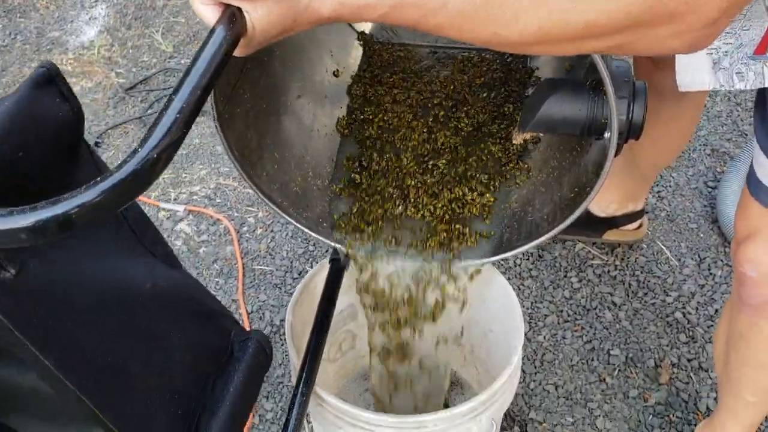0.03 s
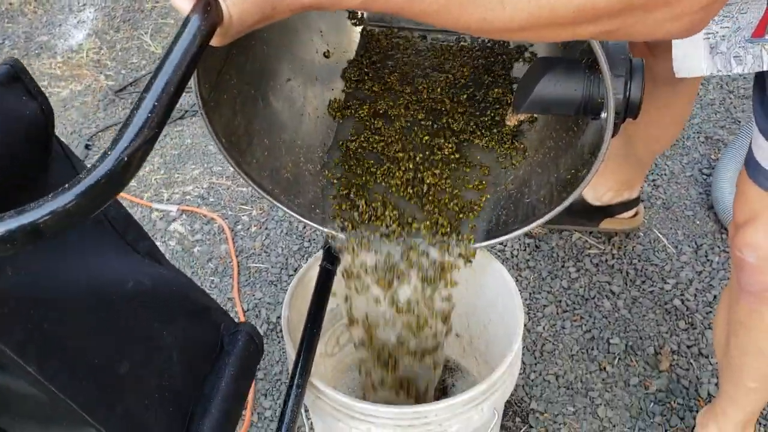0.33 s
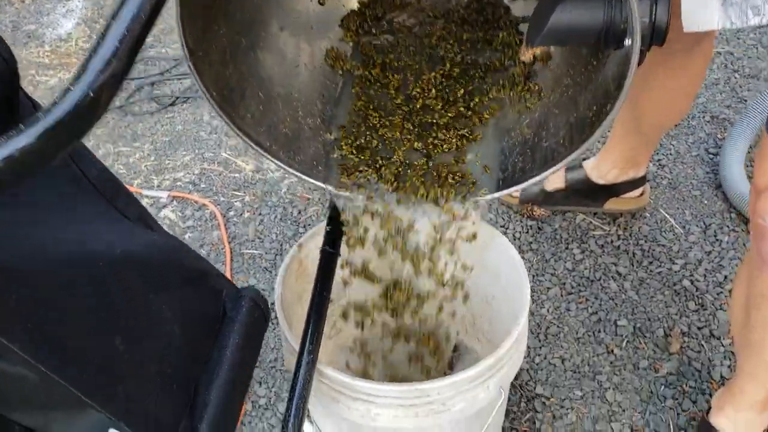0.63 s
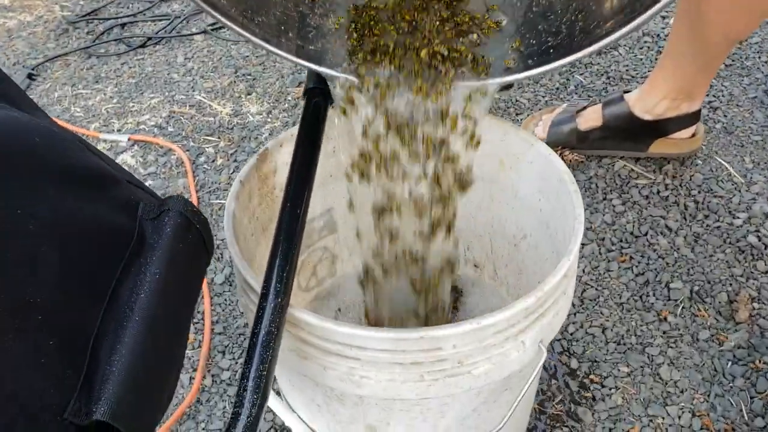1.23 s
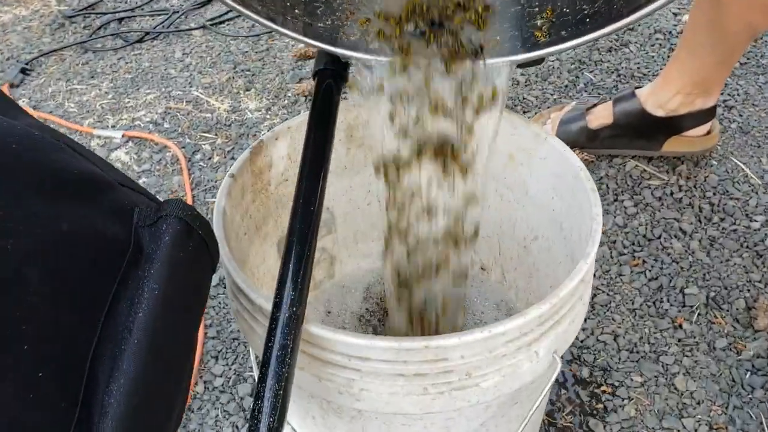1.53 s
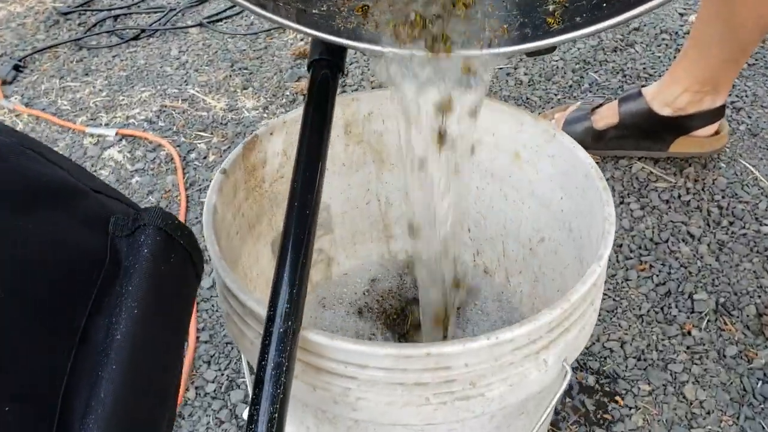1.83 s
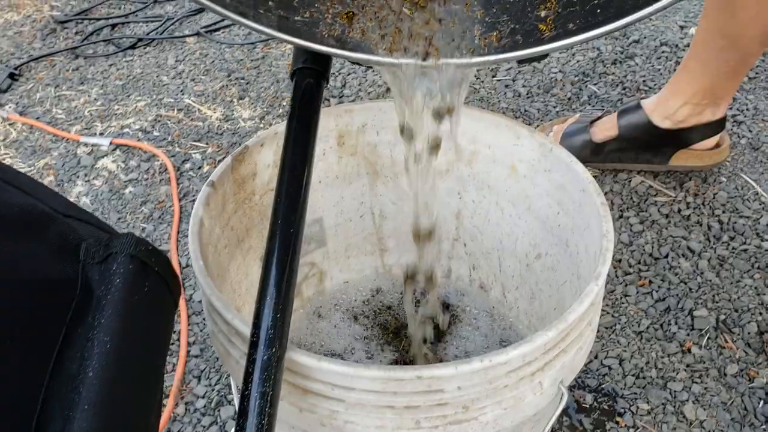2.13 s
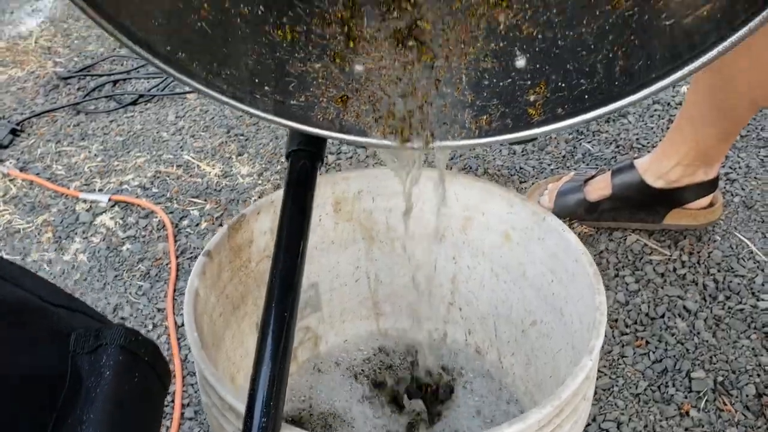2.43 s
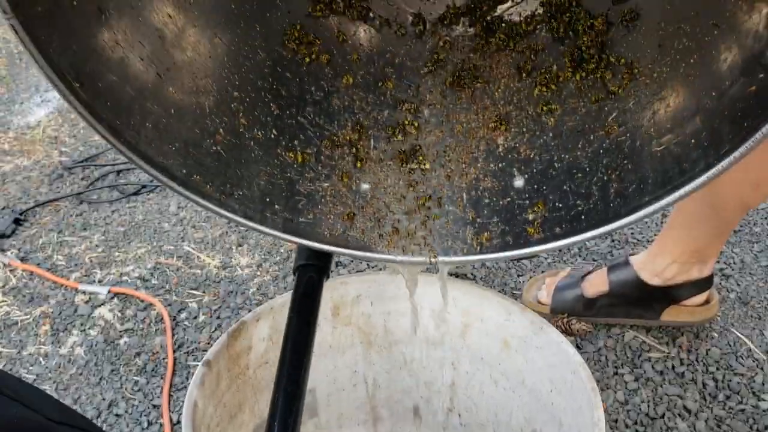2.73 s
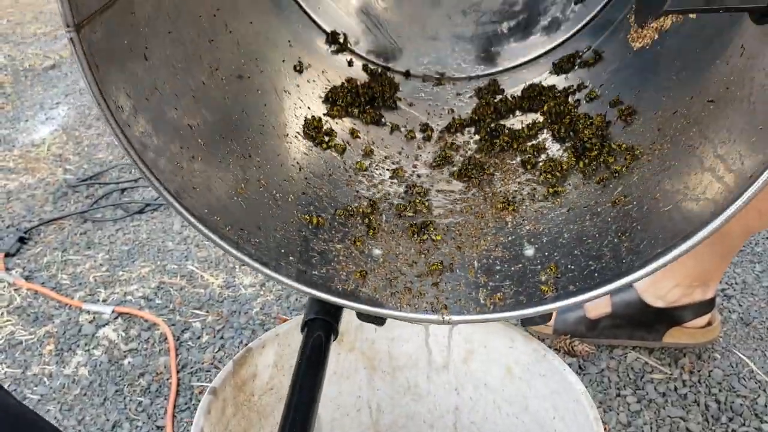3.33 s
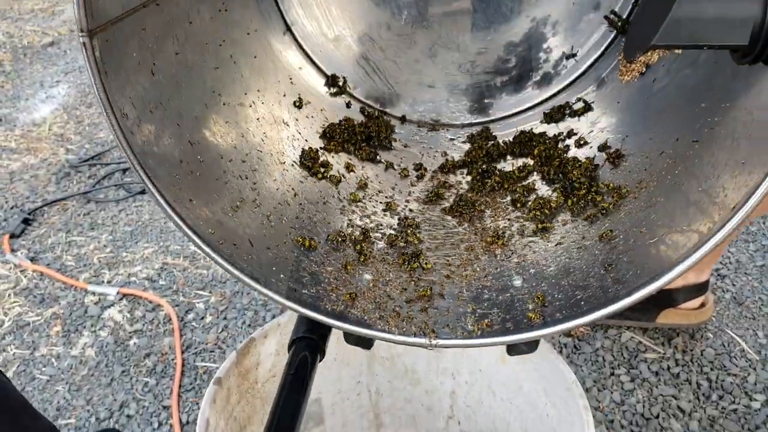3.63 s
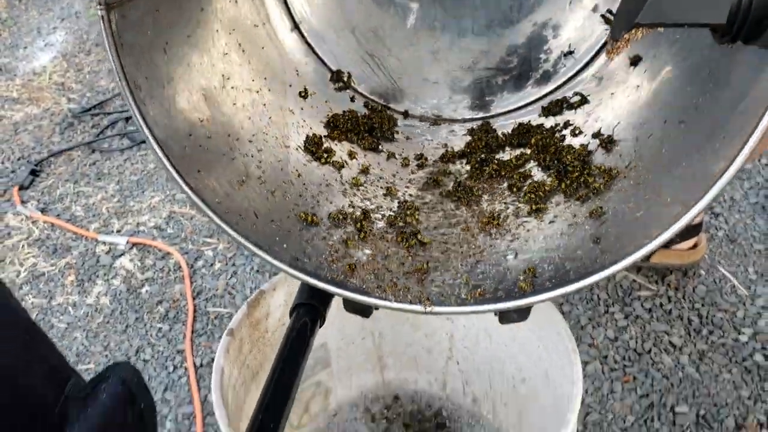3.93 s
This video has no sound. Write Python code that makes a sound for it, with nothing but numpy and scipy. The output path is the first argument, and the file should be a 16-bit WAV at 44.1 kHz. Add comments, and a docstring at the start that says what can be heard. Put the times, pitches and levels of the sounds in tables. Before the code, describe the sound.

A clumpy stream of water gushes into a plastic bucket, tapering off to light drips.

```python
"""Water thick with dead insects pours from a steel drum into a plastic bucket, close to the microphone.
The stream churns the bucket's low resonances, traps bubbles and throws spray; clumps land as splashes.
It thins to a dribble of single drops that tick and slap inside the bucket, a little to the left.
The place is outdoors and quiet: faint open air, and a motor humming far off."""
import sys
import numpy as np
from scipy import signal
from scipy.fft import rfft, irfft, next_fast_len
from scipy.io import wavfile
from scipy.ndimage import map_coordinates

SR = 44100
rng = np.random.default_rng(int(sys.argv[2]) if len(sys.argv) > 2 else 0)


def wav_record(signal):
    """Record a signal, one row per channel, as 16-bit PCM in the file named by sys.argv[1]."""
    frames = np.transpose(np.atleast_2d(signal))
    bounded = np.clip(frames, -1, 1)
    # unit amplitude maps onto the largest positive 16-bit level
    quanta = np.round(bounded * 32767).astype(np.int16)
    wavfile.write(sys.argv[1], SR, quanta)


N = 176400

# The far motor. Each row: frequency in Hz, level in dB.
MOTOR_TONES = [(86.1, -64), (172.3, -71)]
# The pour. Each row: time in seconds, then relative levels in dB of churn, bubbles, spray and fizz.
POUR_LEVELS = [(0, -54, -34, -35, -44), (.16, -43, -37, -35.5, -43.5), (.42, -45, -38, -38, -45.5),
               (.62, -42.5, -32, -36.5, -44.5), (.85, -41.5, -34.5, -38, -42),
               (1.28, -39, -32.5, -36.5, -43), (1.62, -39, -35.5, -38.5, -42),
               (1.88, -41, -34.5, -32.5, -34.5), (2.11, -47, -46.5, -39, -43.5),
               (2.33, -45.5, -39.5, -36, -40.5), (2.52, -57.5, -50.5, -38, -42.5),
               (2.82, -57.5, -48, -40.5, -44.5), (3.1, -54, -52, -47.5, -50.5),
               (3.32, -68.5, -65.5, -52, -54), (3.54, -62.5, -57.5, -50, -52.5),
               (3.72, -73.5, -73.5, -60, -58.5), (4, -68, -98, -63, -70)]
# The stream thinning. Each row: time in seconds, share of a full stream from 0 to 1.
FLOW_SHARE = [(0, 0.9), (1.4, 0.94), (1.9, 0.48), (2.4, .12), (4, .09)]
# Clumps landing. Each row: start in seconds, length in seconds, level in dB.
CLUMP_SPLASHES = [(0.033, 0.033, -32), (0.138, 0.019, -36), (0.734, 0.011, -26), (0.953, 0.03, -29.5),
                  (1.143, 0.07, -31), (1.221, 0.031, -34), (1.269, 0.012, -27), (1.319, 0.0091, -29),
                  (1.326, 0.0062, -26), (1.354, 0.01, -24), (1.389, 0.013, -30), (1.45, 0.015, -25),
                  (1.547, 0.012, -27), (1.593, 0.0095, -24.5), (1.641, 0.013, -29.5), (1.694, .006, -32),
                  (1.706, 0.0085, -24), (2.041, 0.026, -31), (2.146, 0.017, -29), (2.214, 0.043, -28.5),
                  (2.332, 0.037, -37)]
# Heavy clumps reaching the bottom. Each row: start in seconds, level in dB.
CLUMP_THUMPS = [(0.04, -34.5), (0.161, -30), (1.206, -32), (1.356, -32), (1.945, -35)]
# Single drops. Each row: start in seconds, relative level in dB, ring in Hz, relative spatter in dB.
SINGLE_DROPS = [(0.4238, -5.5, 4550, -52), (2.164, 2.5, 4360, -22), (2.271, -5.5, 3340, -42),
                (2.45, -6.5, 3440, -31), (2.463, -12, 6400, -48), (2.4887, -12.5, 6400, -38),
                (2.5187, -5.5, 4000, -33), (2.5622, 0.5, 6540, -32), (2.573, -7.5, 6240, -38),
                (2.597, -14, 5960, -52), (2.709, -3.5, 3390, -38), (2.7503, -14, 7260, -30),
                (2.757, -9, 7160, -29), (2.7989, -11.5, 4860, -32), (2.865, -13, 6700, -25),
                (2.876, -13, 6000, -32), (2.9119, -13.5, 4600, -20), (2.955, -15.5, 3730, -35),
                (3.0448, -10.5, 7400, -31), (3.131, -5, 4200, -30.5), (3.166, -10.5, 6170, -35),
                (3.1805, -14, 6600, -32), (3.19, -14, 6500, -34), (3.2121, -15.5, 6340, -29),
                (3.266, -20.5, 4000, -38), (3.303, -20, 6700, -32), (3.3593, -16, 5430, -49),
                (3.385, -12, 5470, -30.5), (3.481, -18.5, 6600, -47), (3.519, -16, 6850, -33.5),
                (3.5556, -19, 6130, -40), (3.702, -29, 4430, -41), (3.9156, -28, 4660, -60)]
# Air dragged under. Each row: start in seconds, relative level in dB, pitch in Hz.
AIR_POCKETS = [(0.846, -7, 950), (1.278, -14, 760), (1.802, -11.5, 1970), (2.128, -25.5, 359),
               (3.166, -24.5, 980), (3.285, -32.5, 1190), (3.536, -31.5, 845)]
# Blobs slapping the water. Each row: start in seconds, relative level in dB.
BLOB_SLAPS = [(2.448, -17), (2.518, -25.5), (2.573, -25), (2.665, -23), (2.709, -23.5), (2.757, -23.5),
              (2.815, -24), (2.904, -27), (2.953, -24), (3.166, -21.5), (3.286, -28.5), (3.425, -35.5),
              (3.482, -36), (3.5, -31.5), (3.598, -36)]
# Resonances of the bucket's air and body. Each row: centre in Hz, width in Hz, relative gain in dB.
AIR_MODES = [(810, 56, 4.5), (910, 190, -4), (1290, 270, -2.5), (1513, 61, -2.5), (1835, 254, 2.5),
             (2230, 110, 0.5)]
BODY_MODES = [(121, 77, -4.5), (275.8, 32, 4), (366, 226, -4.5)]
# Spectra of the open air and the water sounds. Each row: frequency in Hz, relative level in dB.
OPEN_AIR_SPECTRUM = [(25, -25), (40, 8.5), (65, 1), (330, -9), (500, -18.5), (1000, -14), (2000, -22.5),
                     (16000, -30)]
BUBBLE_SPECTRUM = [(250, -63), (420, -14.5), (570, -6), (660, -1.5), (820, 0), (1150, -1.5), (1500, -6),
                   (1850, -8), (2400, -7.5), (3200, -6)]
SPRAY_SPECTRUM = [(1200, -20), (2300, -11.5), (3100, 0), (4100, 3), (5400, -0.5), (6900, -4), (8000, -12.5),
                  (10000, -46)]
FIZZ_SPECTRUM = [(5500, -14), (8000, -7), (9500, -1), (12000, 2.5), (15800, 3)]
SPLASH_SPECTRUM = [(400, -39), (900, -14), (2300, -4), (3200, 3.5), (4100, 3), (5400, 0.5), (6900, -5),
                   (8100, -12.5), (10500, -9)]
# Stereo width of the bucket's echoes. Each row: frequency in Hz, side over mid in dB.
ECHO_WIDTH = [(100, -23), (300, -2), (700, -11.5), (1500, -3), (3000, 2.5)]
# The bucket's balance at the microphone. Each row: frequency in Hz, left over right in dB.
LEFT_BIAS = [(250, 1), (700, 4), (2000, 2.5), (3300, 2), (5500, -0.5), (7200, 14.5), (8800, -9.5),
             (10500, -1.5), (12500, 2.5), (15500, 6.5)]

BUBBLES_PER_S, DROPLETS_PER_S, PLINKS_PER_S = 1800, 6700, 95  # in a full stream
SURGE_DB, BREAKUP_DB = 2.5, 1.5  # unevenness of a full stream; added as it thins
SIDE_HZ, SIDE_WIDTH_HZ, SIDE_DB = 153, 47, -3.5  # the bucket's side, once loaded with water
SIDE_SHARP, FILL_S = 0.3, 0.42  # it starts higher by this share and sinks as the bucket fills
WALLS_T60_S = 0.066


def amp(db):
    """Decibels to gain."""
    return 10 ** (np.asarray(db) / 20)


def unit(x):
    """x scaled to rms 1."""
    return x / np.sqrt(np.mean(x ** 2) + 1e-20)


def along(points, hz):
    """(Hz, value) points, interpolated on a log frequency axis."""
    knots_hz, values = np.transpose(points)
    return np.interp(np.log(hz + 1), np.log(knots_hz + 1), values)


def curves(rows):
    """One value per sample for each column after the time."""
    times, *columns = np.transpose(rows)
    return [np.interp(np.arange(N) / SR, times, column) for column in columns]


def wobble(rate):
    """A smooth random curve, rate knots a second."""
    return map_coordinates(rng.standard_normal(int(N * rate / SR) + 4), [np.arange(N) * rate / SR])


def filtered(x, response):
    """x through a complex frequency response."""
    size = next_fast_len(N + SR // 2)
    return irfft(rfft(x, size) * response(np.fft.rfftfreq(size, 1 / SR)), size)[..., :N]


def coloured(x, spectrum):
    """x shaped by a (Hz, dB) spectrum, at rms 1."""
    return unit(filtered(x, lambda hz: amp(along(spectrum, hz))))


def resonate(x, modes):
    """x ringing (Hz, width, dB) resonances."""
    return filtered(x, lambda f: sum(amp(db) * 1j * f * width / (hz * hz - f * f + 1j * f * width)
                                     for hz, width, db in modes))


def peaked(x, modes):
    """x through steep (Hz, width, dB) peaks, at rms 1."""
    return unit(filtered(x, lambda f: sum(amp(db) / (1 + (2 * (f - hz) / width) ** 2)
                                          for hz, width, db in modes)))


def add(track, start_s, sound):
    """Mix a sound into the track."""
    i = max(0, round(start_s * SR))
    track[..., i:i + sound.shape[-1]] += sound[..., :max(0, N - i)]


def ping(t, hz, cycles):
    """A bubble's ring: swells for some cycles, then dies."""
    age = t * hz / cycles
    return age * np.exp(1 - age) * np.sin(2 * np.pi * hz * t)


def bubble_cloud(flow, per_s, low_hz, high_hz, cycles, spread_db, samples):
    """Random bubble rings, at rms 1: many in a full stream, few in a thin one."""
    draws = rng.random((int(per_s * N / SR), 4))
    start = (draws[:, 0] * (N - 1)).astype(int)
    kept = draws[:, 1] < flow[start]
    start, pitch, strength = start[kept], draws[kept, 2], draws[kept, 3]
    hz = low_hz + (high_hz - low_hz) * pitch
    gain = amp(spread_db * strength ** 2) * np.sqrt(hz / flow[start])  # short or sparse rings keep power
    rings = gain[:, None] * ping(np.arange(samples) / SR, hz[:, None], cycles)
    positions = start[:, None] + np.arange(samples)
    return unit(np.bincount(positions.ravel(), rings.ravel(), N + samples)[:N])


def outdoors():
    """A motor hums far from the microphone, in faint open-air noise."""
    t = np.arange(N) / SR
    hum = sum(amp(db) * np.sqrt(2) * np.sin(2 * np.pi * hz * t + wobble(6.9)) for hz, db in MOTOR_TONES)
    air = rng.standard_normal(N) + 0.99 * rng.standard_normal((2, N))
    return hum + amp(-62) * coloured(air, OPEN_AIR_SPECTRUM)


def bucket_echoes(x, wet_db, t60_s=WALLS_T60_S):
    """x in stereo with short echoes off the bucket's walls, changing as the water moves."""
    echoes, t = np.zeros((2, N + SR)), np.arange(SR // 10) / SR
    hop = SR // 70
    for i in range(0, N, hop):
        tail = rng.standard_normal((2, len(t))) * amp(-60 * t / t60_s) * (1 - np.exp(-t / 0.00023))
        echo = signal.fftconvolve(x[None, i:i + hop], tail / np.linalg.norm(tail[0]), axes=1)
        echoes[:, i:i + echo.shape[1]] += echo
    mid = x + amp(wet_db) * echoes[0, :N]
    side = amp(wet_db) * filtered(echoes[1, :N], lambda hz: amp(along(ECHO_WIDTH, hz)))
    return np.array([mid + side, mid - side]) / np.sqrt(1 + amp(2 * wet_db))


def thumps():
    """A heavy clump reaches the bottom: one low push, hardly ringing."""
    track, t = np.zeros(N), np.arange(SR // 10) / SR
    for start, db in CLUMP_THUMPS:
        add(track, start, amp(db) * ping(t, hz=155, cycles=0.65))
    return track


def plops():
    """A pocket of air, dragged under, rings for a few cycles."""
    track, t = np.zeros(N), np.arange(SR // 20) / SR
    for start, db, hz in AIR_POCKETS:
        add(track, start, amp(db - 8.5) * ping(t, hz, cycles=1.07))
    return track


def slaps():
    """Blobs slap the water, ringing the bucket's air and body; drops tap them lightly."""
    knocks, t = np.zeros(N), np.arange(SR // 20) / SR
    for start, db in BLOB_SLAPS:
        add(knocks, start, amp(db) * ping(t, hz=1160, cycles=0.36))
    for start, db, _, _ in SINGLE_DROPS:
        add(knocks, start, amp([db - 19]))
    return amp(-3.5) * resonate(knocks, AIR_MODES) + amp(-0.5) * resonate(knocks, BODY_MODES)


def drops():
    """A drop cracks on the surface, rings a tiny bubble and scatters fine spatter."""
    rings, crack, spatter = np.zeros((3, N))
    t = np.arange(SR // 20) / SR
    lead_s = t.mean()  # each burst peaks mid-window, on the impact
    burst = lambda decay_s: np.exp(-abs(t - lead_s) / np.where(t < lead_s, 0.00017, decay_s))
    for start, db, hz, spatter_db in SINGLE_DROPS:
        add(rings, start, amp(db - 10) * ping(t, hz, cycles=1.09))
        add(crack, start - lead_s, amp(db - 24.5) * burst(decay_s=0.00096))
        add(spatter, start - lead_s, amp(spatter_db + 6.5) * burst(decay_s=0.00063))
    crack *= coloured(rng.standard_normal(N), SPRAY_SPECTRUM)
    spatter *= coloured(rng.standard_normal(N), FIZZ_SPECTRUM)
    return rings + crack + spatter


def splashes():
    """Each clump bursts into a short shower of droplets."""
    swell, t = np.zeros(N), np.arange(SR // 5) / SR
    for start, length, db in CLUMP_SPLASHES:
        age = 2 * t / length
        add(swell, start, amp(db) * age * np.exp((1 - age * age) / 2))
    shower = bubble_cloud(np.ones(N), 7000, 486, 16160, cycles=0.74, spread_db=7.5, samples=300)
    return swell * coloured(shower, SPLASH_SPECTRUM)


def churn():
    """The plunging stream booms in the bucket and shakes its side, which rings lower as it fills."""
    churn_db, flow = curves(POUR_LEVELS)[0], curves(FLOW_SHARE)[0]
    pounding = lambda: rng.standard_normal(N) * amp(2.8 * wobble(70))
    pitch_ratio = 1 + SIDE_SHARP * np.exp(-np.arange(N) / SR / FILL_S)
    steady_side = peaked(pounding(), [(SIDE_HZ, SIDE_WIDTH_HZ, 0)])
    sinking_side = np.interp(np.cumsum(pitch_ratio), np.arange(N), steady_side, period=N)
    boom = peaked(pounding(), BODY_MODES)
    return amp(churn_db) * unit(boom + amp(SIDE_DB) * flow * sinking_side)


def stream():
    """Bubbles, spray and fizz surge together; as the stream breaks up, the bucket's air rings clearer."""
    _, bubble_db, spray_db, fizz_db = curves(POUR_LEVELS)
    flow = curves(FLOW_SHARE)[0]
    depth_db = SURGE_DB + BREAKUP_DB * (1 - flow)
    shared_surge = wobble(130)

    def surging(per_s, low_hz, high_hz, hiss, **ring):
        """A bubble cloud over a wash of noise, swelling with the stream."""
        surge = amp(depth_db * (0.87 * shared_surge + 0.88 * wobble(260)))
        cloud = bubble_cloud(flow, per_s, low_hz, high_hz, **ring)
        return surge * (cloud + hiss * np.sqrt(flow) * rng.standard_normal(N))

    gurgle = lambda: surging(BUBBLES_PER_S, 327, 3100, hiss=0.54, cycles=0.63, spread_db=6.5, samples=800)
    mist = lambda: surging(DROPLETS_PER_S, 2230, 15200, hiss=0.47, cycles=0.38, spread_db=12, samples=120)
    full = np.sqrt(flow) * coloured(gurgle(), BUBBLE_SPECTRUM)
    hollow = np.sqrt(1 - flow) * peaked(gurgle(), AIR_MODES)
    plinks = flow * bubble_cloud(flow, PLINKS_PER_S, 988.5, 4636, cycles=4.8, spread_db=-8, samples=2000)
    bubbles = amp(bubble_db - 1.96) * (full + hollow + amp(-8.5) * plinks)
    spray = amp(spray_db) * coloured(mist(), SPRAY_SPECTRUM)
    fizz = amp(fizz_db) * coloured(mist(), FIZZ_SPECTRUM)
    return bubbles + spray + fizz


def scene():
    """The bucket stands close, a little left of the microphone, with the open air behind."""
    pour = bucket_echoes(stream() + splashes(), wet_db=-1)
    ticks = bucket_echoes(drops(), wet_db=0.5, t60_s=0.024)
    blobs = bucket_echoes(slaps() + plops(), wet_db=-5.5)
    water = pour + ticks + blobs + churn() + thumps()
    placed = filtered(water, lambda hz: amp(np.outer([0.5, -0.5], along(LEFT_BIAS, hz))))
    return placed + outdoors()


def record(dry):
    """The microphone thins the deep bass and keeps nothing above its band limit."""
    low_cut_hz, top_hz = 73, 16000
    return filtered(dry, lambda hz: (hz < top_hz) * hz ** 2 / np.hypot(hz ** 2, low_cut_hz ** 2))


dry = scene()
out = record(dry)
wav_record(out)
```